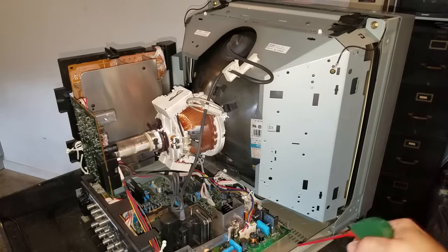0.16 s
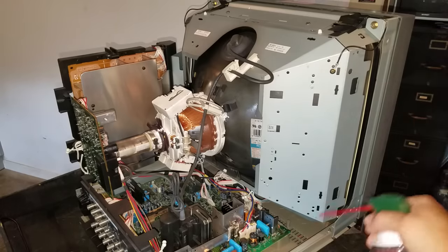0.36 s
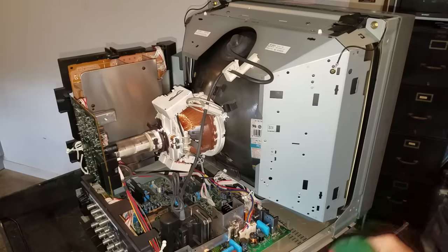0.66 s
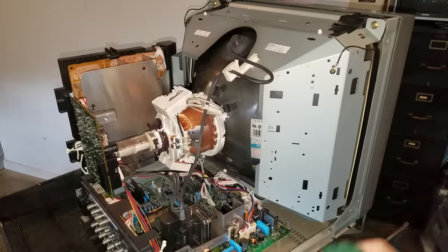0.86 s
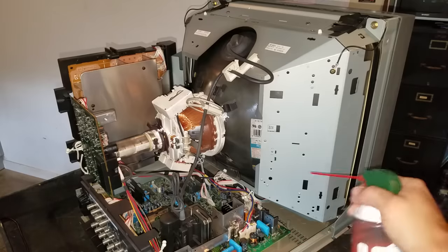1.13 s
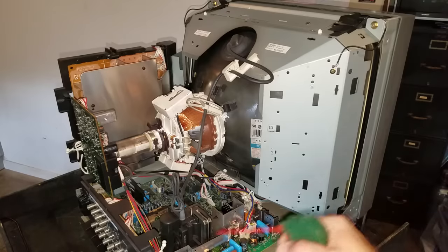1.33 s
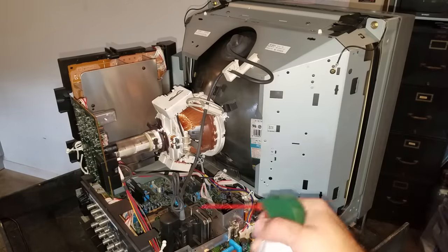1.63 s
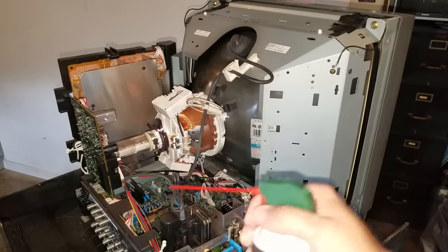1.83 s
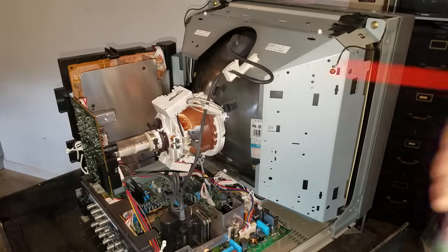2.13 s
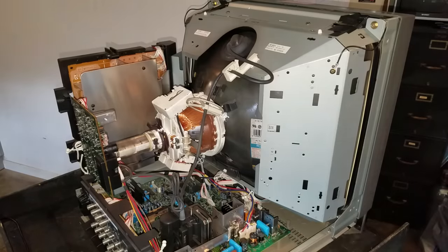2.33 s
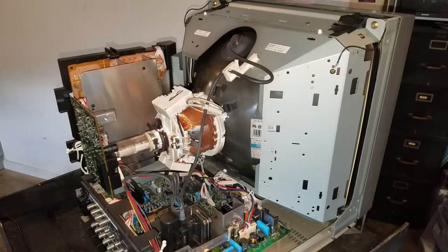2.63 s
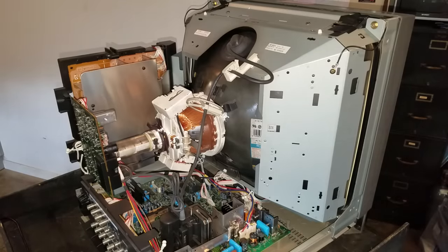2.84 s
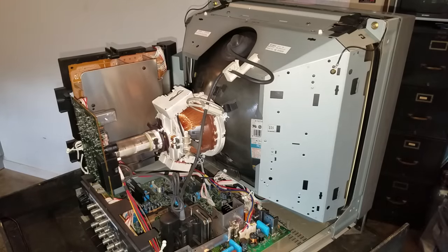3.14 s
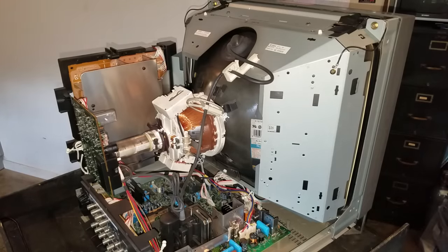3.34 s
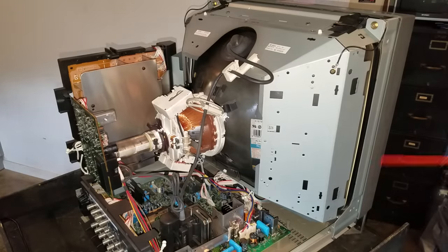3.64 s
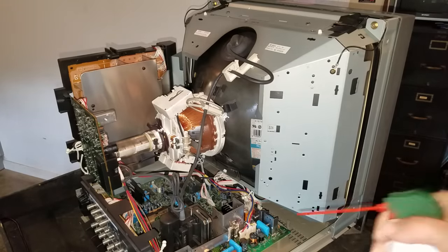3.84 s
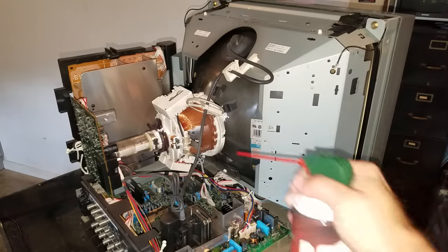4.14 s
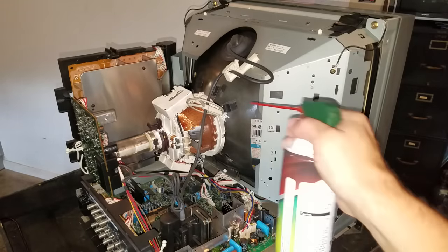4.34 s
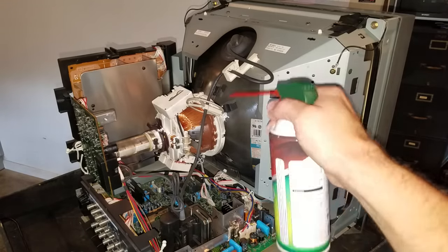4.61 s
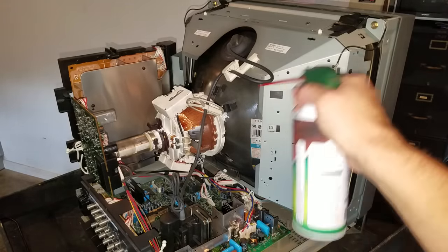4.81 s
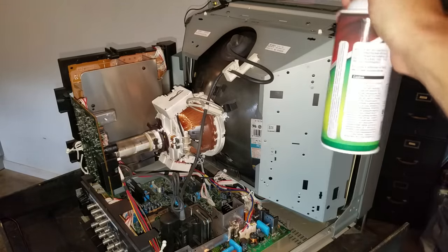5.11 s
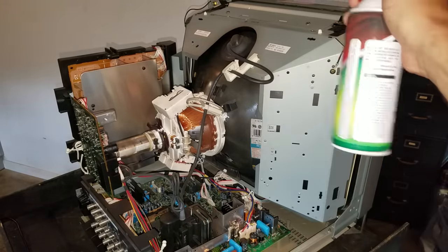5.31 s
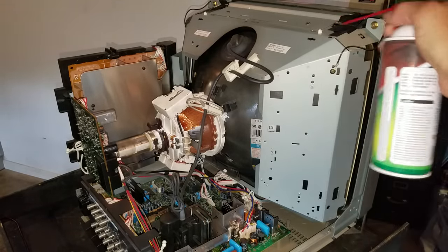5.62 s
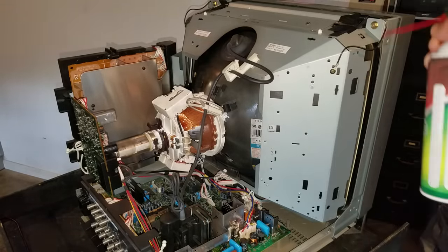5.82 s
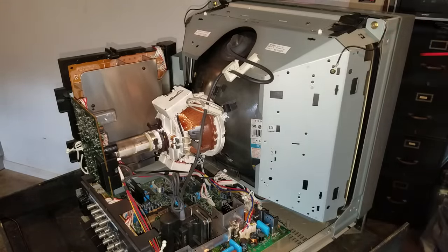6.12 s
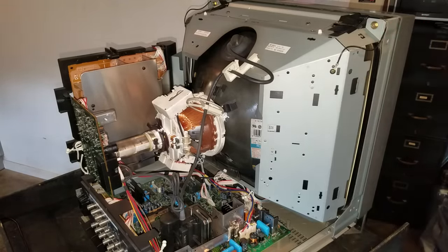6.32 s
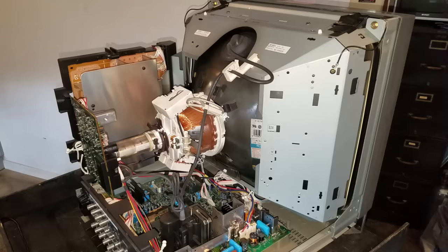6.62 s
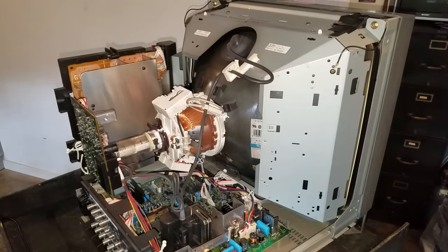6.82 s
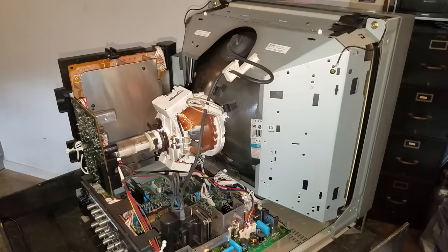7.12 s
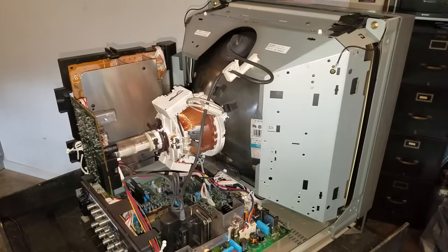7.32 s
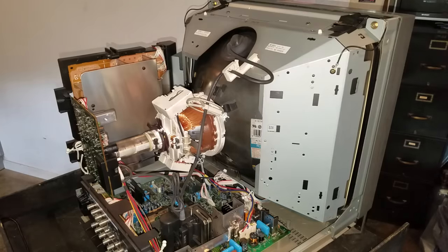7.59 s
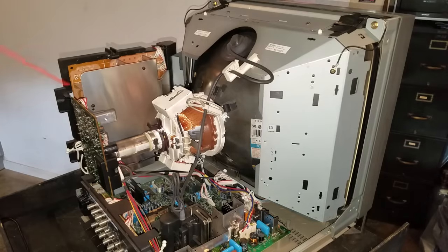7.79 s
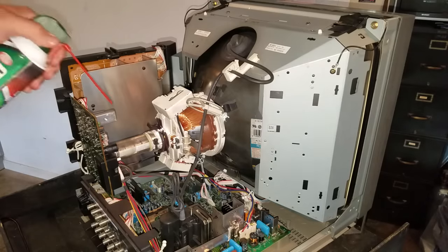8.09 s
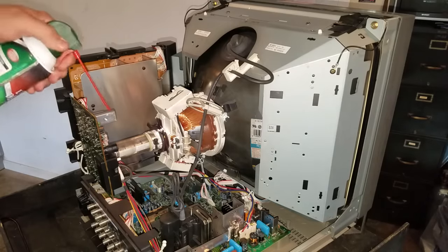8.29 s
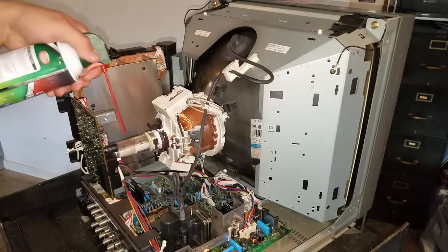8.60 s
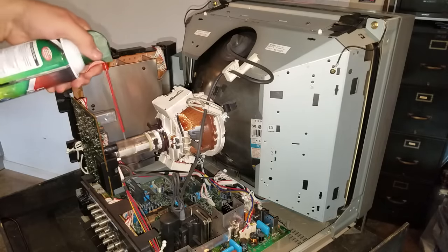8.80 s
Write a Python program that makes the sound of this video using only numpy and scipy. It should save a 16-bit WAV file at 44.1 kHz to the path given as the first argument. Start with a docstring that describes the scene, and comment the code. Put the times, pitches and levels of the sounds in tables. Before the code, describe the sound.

A spray can hisses in three long, sharp bursts over open electronics, with brief wind buffeting and a faint electrical hum.

```python
"""A sharp hiss of compressed air sweeps, in three sprays, over an open electronic chassis in a quiet room.
Turbulence at the nozzle makes the hiss; where the jet strikes, boards splash, vent slots ring and
hollows roar or whistle. A transformer hums beneath, and for a moment the draught buffets the two
microphone ports. In the pause before the last spray a hand shifts the can with rustles and taps."""
import sys
import numpy as np
from scipy import signal
from scipy.io import wavfile
from scipy.ndimage import map_coordinates

SR = 44100
rng = np.random.default_rng(int(sys.argv[2]) if len(sys.argv) > 2 else 0)


def materialize(psi):
    """Save the field psi as 16-bit PCM at rate SR to the path in sys.argv[1].

    A 1-D psi becomes a single channel; in a 2-D psi each row is a channel.
    """
    bounded = np.clip(np.atleast_2d(psi).T, -1, 1)
    quanta = np.round(bounded * 32767).astype(np.int16)
    wavfile.write(sys.argv[1], SR, quanta)


N = 394694

# Trigger presses: open_s, shut_s, release_s, drop_db
SPRAYS = [(-0.1, 2.646, .03, -18), (2.777, 6.102, .06, -12), (7.853, 9.2, .03, -12)]
# Slow changes in the spray's loudness and direction, one curve a press; the sound dips briefly after the gusts:
# time_s, nozzle_db, left_minus_right_db, splash_db, edges_db, large_hollow_db, small_hollows_db
SPRAY_LEVELS = [
    [(0, -25.5, -6, -28, -25, -42, -31), (.45, -26.5, -7.5, -31.5, -35, -39, -34),
     (.75, -23.5, -7, -27, -28.5, -34.5, -29), (1.05, -23, -8, -28.5, -28, -40, -32),
     (1.35, -27, -5.5, -31, -32.5, -39, -36), (1.8, -26.5, -5.5, -32.5, -38, -43, -43),
     (2.1, -23.5, -4.5, -31.5, -38, -57, -48), (2.3, -23, -10.5, -32.5, -42, -53, -50),
     (2.55, -24, -14.5, -32.5, -41.5, -65, -51), (2.65, -26.5, -14, -34.5, -43.5, -84, -53)],
    [(2.79, -23.5, -14, -29, -40, -75, -74), (2.93, -25.5, -18, -34, -41.5, -73, -70),
     (3.05, -26, -14, -31, -29.5, -72, -71), (3.35, -25.5, -20.5, -31, -30, -75, -70),
     (3.49, -30, -13, -34, -59, -75, -66), (3.55, -36.5, -7.5, -46, -54, -68, -63.5),
     (4.15, -40.5, -5, -46, -52.5, -58, -58.5), (4.29, -27, -4, -31, -34.5, -40.5, -39.5),
     (4.55, -29, -2.5, -26.5, -32, -46, -35), (4.9, -24.5, -3.5, -30, -32, -40.5, -37.5),
     (5.1, -27, -3.5, -33, -37.5, -48, -41), (5.4, -26, -5.5, -35, -36.5, -58, -45.5),
     (5.65, -27, -6.5, -32, -32.5, -60, -44), (5.8, -28.5, -7, -28, -46, -52, -42),
     (5.95, -25.5, -8, -24, -40.5, -49, -42), (6.11, -33, -8, -27, -32, -59, -38.5)],
    [(7.86, -27, -5, -35, -34.5, -52, -45), (7.97, -23.5, -4.5, -29.5, -34, -35.5, -34.5),
     (8.2, -25.5, -6, -31.5, -31.5, -39.5, -32.5), (8.4, -26.5, -5.5, -33.5, -29.5, -36.5, -32),
     (8.7, -26, -5, -33, -31, -37, -39), (8.95, -26, -4.5, -28, -30, -35.5, -37.5)],
]
# The jet crosses vents: start_s, hold_s, nozzle_change_db, splash_db, edges_db, slots_db
VENT_CROSSINGS = [(0.0, 0.026, -5, -23.5, -17.5, -23), (0.063, 0.024, -3.5, -41, -31, -32),
                  (0.312, 0.047, 0.5, -33, -30.5, -39), (0.481, 0.043, -1, -28, -22.5, -23),
                  (0.526, 0.03, -2.5, -31, -32, -27.5), (0.866, .04, -1.5, -33, -33, -27.5),
                  (1.115, .07, -1.5, -35, -21.5, -24), (1.201, 0.038, -2, -30, -19.5, -22.5),
                  (1.253, 0.021, 1, -28, -35, -36.5), (1.457, 0.061, 0, -31.5, -29.5, -32.5),
                  (1.607, 0.055, 0, -31, -30, -31.5), (2.17, .04, 1.5, -29.5, -45, -48),
                  (3.34, .05, 1.5, -41, -52, -48), (3.413, 0.018, 2.5, -30.5, -27.5, -33),
                  (4.29, 0.02, 0, -49, -34, -36), (4.37, 0.022, 1.5, -30, -31, -35),
                  (4.45, 0.11, 3, -29.5, -28.5, -34), (4.597, 0.088, 0.8, -32, -24, -36),
                  (4.772, 0.036, -0.5, -31, -28.5, -32), (4.915, 0.02, 3.5, -22.5, -24.5, -28.5),
                  (4.953, .05, -1.5, -41, -28.5, -27), (5.557, 0.016, 1.5, -39, -45, -29.5),
                  (5.656, 0.021, 7.5, -19, -23, -31.5), (5.705, 0.086, 0.5, -24.5, -21, -26),
                  (5.805, 0.1, 7.5, -22, -41.5, -37), (6.02, 0.019, 1.5, -30, -38, -42),
                  (6.097, 0.016, 1, -33, -46, -54), (8.067, 0.057, -0.5, -42, -54, -29),
                  (8.15, .04, -1, -35.5, -28.5, -25), (8.221, 0.072, 0.5, -29, -25, -32.5),
                  (8.302, 0.084, .3, -43, -32, -28.5), (8.436, 0.29, 1.1, -27, -29.5, -52),
                  (8.763, 0.068, 0.3, -30, -29.5, -34.5)]
# The jet passes the mouth of a hollow: start_s, hold_s, large_hollow_db, small_hollows_db
HOLLOW_BLOWS = [(0.0, 0.033, -59, -31), (0.153, .02, -33.5, -47), (0.216, 0.016, -46, -26.5),
                (0.965, 0.078, -34.5, -34), (1.477, 0.065, -47, -36), (1.743, 0.015, -35, -44),
                (3.936, .03, -57, -57), (4.954, .03, -48, -35), (5.435, .03, -46, -38),
                (5.55, 0.027, -49, -38), (5.735, 0.058, -53, -31.5), (8.114, 0.021, -42, -28.5),
                (8.81, 0.026, -39, -35)]
# Noise spectra: frequency_hz, relative_density_db
NOZZLE_SPECTRUM = [(5500, -33.5), (6600, -5), (8150, -9.5), (9640, -13), (11300, -10), (12800, -7.5),
                   (14200, -6.5), (15100, -10.5), (16500, -7.5)]
SPLASH_SPECTRUM = [(2200, -8), (3300, -0.5), (4800, 1.5), (6500, -3.5), (9000, -12.5)]
EDGE_SPECTRUM = [(1200, -19), (1600, -1.5), (2200, -3.5), (2900, -0.5), (3900, -16)]
SLOT_SPECTRUM = [(750, -11.5), (1000, 1.5), (1300, -1.5), (1800, -15)]
LARGE_HOLLOW_SPECTRUM = [(130, -12), (250, -8), (400, -3), (600, -14.5)]
SMALL_HOLLOW_SPECTRUM = [(350, -19), (550, -4.5), (800, -0.5), (1200, -12.5)]
ROOM_SPECTRUM = [(25, -21), (55, -5.5), (85, -8.5), (130, -6), (190, -3.5), (240, -7), (400, -15.5),
                 (1180, -28.5), (2890, -26), (9460, -41.5), (15800, -37)]
LARGE_EDDY_SPECTRUM = [(30, -22), (140, -0.5), (300, -11.5), (500, -17.5)]
SMALL_EDDY_SPECTRUM = [(200, -1), (420, -1.5), (750, -5.5), (1700, -18), (3000, -35)]
RUSTLE_SPECTRUM = [(500, 0), (1100, 0), (2600, 0), (4500, -11), (7500, -10), (9700, -25), (13500, -13.5),
                   (15800, -14)]
# Resonances of the struck parts, against their broad noise: pitch_hz, bandwidth_hz, relative_db
SPLASH_MODES = [(4700, 350, -10), (6350, 300, -11), (8300, 450, -13)]
EDGE_MODES = [(1716, 50, -9), (2057, 70, -9), (2665, 90, -7)]
SLOT_MODES = [(1085, 70, 2), (1290, 60, -9)]
LARGE_HOLLOW_MODES = [(388, 44, -5.5)]
SMALL_HOLLOW_MODES = [(647, 94, -7.5)]
# Likeness of the sound at the two ports: frequency_hz, coherence_ratio
PORT_COHERENCE = [(60, 0.54), (150, 0.93), (380, 0.95), (950, 0.54), (2380, 0.3), (5980, 0.02),
                  (15000, 0.033)]
# Late arrival at the left port: time_s, delay_ms
LEFT_DELAY = [(0, 0.083), (1.3, 0.037), (1.8, 0.038), (4.5, -0.15), (5.8, 0.14), (6.3, 0.047), (6.8, -0.17),
              (7.7, -0.084), (8.95, -0.084)]
# Swelling and sinking of hum and room air: time_s, level_db
BACKGROUND_LEVEL = [ (0.0, -44.5), (0.17, -41), (0.56, -45.5), (0.63, -42), (1.02, -37), (1.15, -43),
                    (2.13, -39), (2.3, -45.5), (3.62, -54), (4.06, -55.5), (4.17, -49), (4.29, -40.5),
                    (4.67, -39.5), (5.46, -36.5), (5.55, -39), (5.92, -48.5), (6.14, -44.5), (6.43, -46),
                    (6.94, -39.5), (7.63, -38), (8.46, -38.5), (8.82, -37.5), (8.95, -38), ]
# Faint partials against the main hum: frequency_ratio, relative_db
HUM_PARTIALS = [(.5, -29), (2, -25)]
# The jet crosses a hole, and once (the wide row at 1.227 s) the can spits: centre_s, length_s, pitch_hz,
# bandwidth_hz, level_db
HOLE_WHISTLES = [(0.255, 0.18, 804, 60, -35), (0.856, 0.21, 1645, 60, -31), (1.227, 0.026, 4270, 2490, -18),
                 (1.493, 0.074, 610, 60, -31.5), (1.505, 0.063, 1374, 80, -25.5),
                 (1.745, 0.066, 644, 50, -31), (4.438, 0.016, 1510, 80, -25.5),
                 (4.964, 0.055, 830, 60, -31), (5.947, 0.3, 4730, 600, -31), (6.052, 0.24, 2800, 800, -26),
                 (6.086, 0.083, 574, 45, -36), (8.136, 0.09, 710, 60, -40.5), (8.304, 0.1, 1950, 80, -30),
                 (8.614, 0.15, 2350, 250, -26)]
# Gusts on the ports: start_s, hold_s, left_db, right_db, small_over_large_eddies_db
PORT_GUSTS = [(2.354, 0.033, -34.5, -44, -20), (2.457, 0.036, -36, -37.5, -12),
              (2.583, 0.034, -35, -36, -20), (2.64, .02, -28, -44, -28), (2.801, 0.0047, -5, -35, -16),
              (2.842, 0.046, -14, -37, -27), (2.883, 0.043, -8, -40, -18), (2.913, 0.014, -5.5, -36, 5),
              (2.955, 0.048, -5, -31, -2), (3.0, 0.46, -27.5, -25, 1), (3.047, 0.029, -5.5, -31, 8.5),
              (3.082, 0.011, -11, -32, 0), (3.154, 0.017, -14, -30, -2.5), (3.255, .03, -20, -28, -4),
              (3.338, 0.056, -10.5, -41, -7.5), (3.461, 0.0094, -9, -42, -4), (3.474, 0.0041, -13, -40, 3),
              (3.498, 0.018, -47, -46, -30), (4.923, 0.016, -35, -51, -16.5),
              (5.565, 0.24, -48, -48.5, -12), (5.89, 0.038, -50, -35, -6)]
# Single eddies at the right port: time_s, level_db, time_scale_ms
EDDY_POPS = [(3.22, -8, 1.5), (3.297, -10, 1.8), (3.319, -9, 2.5), (3.411, -8, 2.5)]
# Strokes of hand and sleeve: start_s, decay_s, level_db, relative_treble_db
HAND_STROKES = [(6.556, 0.44, -61, -2), (6.676, 0.11, -56, -1), (6.834, .17, -63, 7),
                (7.108, 0.14, -54.5, -6), (7.238, 0.05, -59, 0), (7.315, 0.19, -58.5, 4),
                (7.462, .07, -60, 3), (7.592, 0.12, -57, -4), (7.718, 0.33, -65, -3)]
# Knocks as the can is shifted: start_s, peak_db, pitch_hz, ring_s
CAN_TAPS = [(6.602, -40, 940, 0.0086), (6.676, -35, 1260, 0.01), (6.741, -39.5, 1170, 0.01),
            (7.112, -40, 940, .012), (7.149, -34, 2680, .012), (7.243, -47, 1630, .012),
            (7.287, -43, 915, 0.011), (7.358, -44, 1940, .012), (7.466, -38, 2800, 0.0092),
            (7.572, -31, 1910, 0.0088), (7.594, -39, 560, .015)]

TIME_S = np.arange(N) / SR
HOP = 32  # samples a step of the swell envelopes
HISS_TAIL_DB_PER_S, BODY_TAIL_DB_PER_S = 181, 111
RESIDUE_DB = -14  # what is left in the room once a sound stops


def amp(db):
    """Amplitude grows tenfold every 20 dB."""
    return 10 ** (np.asarray(db) / 20)


def unit_rms(x):
    """Normalisation to unit mean power."""
    return x / np.sqrt(np.mean(x ** 2) + 1e-20)


def plus_db(a_db, b_db):
    """Incoherent sounds add in power."""
    return 10 * np.log10(amp(a_db) ** 2 + amp(b_db) ** 2)


def in_time(rows):
    """Linear interpolation of each column, one value a sample."""
    times_s, *columns = np.transpose(rows)
    return [np.interp(TIME_S, times_s, column) for column in columns]


def at_hz(points, hz):
    """Interpolation on a log-frequency axis."""
    frequencies_hz, values = np.transpose(points)
    return np.interp(np.log(hz), np.log(frequencies_hz), values)


def filtered(x, order, hz, kind="low"):
    """A filter with a maximally flat passband."""
    return signal.sosfilt(signal.butter(order, hz, kind, fs=SR, output="sos"), x)


def drift(rate_hz):
    """Low-passed noise gives a slow random fluctuation of rms 1."""
    step, settle = 40, 2000
    pole = np.exp(-2 * np.pi * step * rate_hz / SR)
    white = rng.standard_normal(N // step + settle + 2)
    slow = signal.lfilter([1], [1, -2 * pole, pole * pole], white)[settle:]
    return np.interp(np.arange(N) / step, np.arange(len(slow)), unit_rms(slow))


def resonate(x, hz, width_hz):
    """A damped resonator with unit gain at its peak."""
    pole = np.exp(-np.pi * width_hz / SR)
    gain = (1 - pole * pole) / 2
    return signal.lfilter([gain, 0, -gain], [1, -2 * pole * np.cos(2 * np.pi * hz / SR), pole * pole], x)


def panned(left_minus_right_db):
    """A level difference gives direction: two gains whose mean is 1."""
    left = np.atleast_1d(amp(left_minus_right_db))
    return 2 * np.array([left, np.ones_like(left)]) / (1 + left)


def both_ports(x):
    """A path difference brings sound to the left port early or late."""
    delay = in_time(LEFT_DELAY)[0] * SR / 1000
    return np.array([map_coordinates(x, [np.arange(N) - delay], order=3, mode="nearest"), x])


def swells(events, rise_db_per_s, fall_db_per_s):
    """Exponential rise up to the start, hold and exponential decay: one row of gains an event."""
    t, start_s, hold_s = np.arange(0, N + HOP, HOP) / SR, events[:, :1], events[:, 1:2]
    before_s, after_s = np.maximum(start_s - t, 0), np.maximum(t - start_s - hold_s, 0)
    return amp(-rise_db_per_s * before_s - fall_db_per_s * after_s)


def per_sample(envelope):
    """Linear interpolation from hops to samples."""
    return np.interp(np.arange(N) / HOP, np.arange(len(envelope)), envelope)


def summed_db(shapes, levels_db):
    """Overlapping swells add in power: one level curve a column."""
    powers = amp(levels_db).T ** 2 @ shapes ** 2
    return [per_sample(10 * np.log10(power + 1e-12)) for power in powers]


def turbulence(spectrum, together_db, patchy_db, rate_hz, coherent=True):
    """Random modulation: third-octave bands of stereo noise flicker partly in step, partly alone."""
    shared, separate, together = 0, 0, drift(rate_hz)
    limits_hz = 22 * 2 ** np.arange(0, 9.7, 1 / 3)
    white = rng.standard_normal((2, 3, N))  # neighbouring bands get unrelated noise
    for k, (low, high) in enumerate(zip(limits_hz, limits_hz[1:])):
        hz = np.sqrt(low * high)
        if spectrum[0][0] < hz * 1.12 and hz < spectrum[-1][0] * 1.12:
            band = filtered(white[k % 2], 2, [low, high], "band")
            coherence = coherent * np.clip(at_hz(PORT_COHERENCE, hz), 0, 1)
            gain = amp(at_hz(spectrum, hz) + together_db * together + patchy_db * drift(rate_hz))
            shared = shared + gain * np.sqrt(coherence) * band[0]
            separate = separate + gain * np.sqrt(1 - coherence) * band[1:]
    out = both_ports(shared) + separate
    return out / np.sqrt(np.mean(out.mean(axis=0) ** 2))


def struck_part(spectrum, modes, together_db, patchy_db, rate_hz, ring_db=0):
    """Forced resonance: air on a surface makes broad noise and drives modes that flicker as it wanders."""
    ringing, flicker_db = 0, 2
    for hz, width_hz, db in modes:
        gain = amp(db + flicker_db * drift(5.7))
        ringing = ringing + gain * unit_rms(resonate(rng.standard_normal(N), hz, width_hz))
    return turbulence(spectrum, together_db, patchy_db, rate_hz) + amp(ring_db) * both_ports(ringing)


def valve_db(tail_db_per_s, drop_share=1):
    """The valve gates the flow: a quick opening, a drop on release, then exponential decay."""
    opening_s, closed_db = .03, -23
    out = np.full(N, -90.)
    for open_s, shut_s, release_s, drop_db in SPRAYS:
        onset_db = closed_db * np.clip(1 - (TIME_S - open_s) / opening_s, 0, 1) ** 2
        release_db = drop_share * drop_db * np.clip((TIME_S - shut_s) / release_s, 0, 1)
        decay_db = tail_db_per_s * np.maximum(TIME_S - shut_s - release_s, 0)
        out = np.where(TIME_S >= open_s, onset_db + release_db - decay_db, out)
    return out


def nozzle_hiss(level_db):
    """Turbulent mixing radiates hiss; a resonance of the thin tube lifts the very top."""
    hiss = turbulence(NOZZLE_SPECTRUM, together_db=.53, patchy_db=.96, rate_hz=20)
    sizzle = amp(1.5) * resonate(hiss, hz=15300, width_hz=700)
    return amp(level_db + valve_db(HISS_TAIL_DB_PER_S)) * (hiss + sizzle)


def board_splash(level_db):
    """An impinging jet radiates bright noise from the boards."""
    return amp(level_db) * struck_part(SPLASH_SPECTRUM, SPLASH_MODES, .58, 1.3, rate_hz=17)


def edge_noise(level_db):
    """Edges scatter turbulence into ringing midrange noise."""
    return amp(level_db) * struck_part(EDGE_SPECTRUM, EDGE_MODES, .92, 2.7, rate_hz=16)


def vent_slots(level_db):
    """Slots resonate fully only when squarely struck, and pass little below their lowest mode."""
    full_ring_db, loss_db_per_db = -25, .45
    ring_db = loss_db_per_db * np.minimum(level_db - full_ring_db, 0)
    noise = struck_part(SLOT_SPECTRUM, SLOT_MODES, .7, .93, rate_hz=22, ring_db=ring_db)
    return amp(level_db) * filtered(noise, 6, 1036, "high")


def hollow_roar(large_db, small_db):
    """Cavity resonance colours the noise: the larger the hollow, the deeper its roar."""
    large = struck_part(LARGE_HOLLOW_SPECTRUM, LARGE_HOLLOW_MODES, 1, 2.3, rate_hz=14)
    small = struck_part(SMALL_HOLLOW_SPECTRUM, SMALL_HOLLOW_MODES, 1, 1.5, rate_hz=9.9)
    return amp(large_db) * large + amp(small_db) * small


def jet():
    """One jet excites every part; levels swell as it crosses vents and hollows."""
    nozzle_db, pan_db, splash_db, edges_db, large_db, small_db = in_time(sum(SPRAY_LEVELS, []))
    crossings, blows = np.array(VENT_CROSSINGS), np.array(HOLLOW_BLOWS)
    crossing_shapes = swells(crossings, rise_db_per_s=901, fall_db_per_s=279.5)
    blow_shapes = swells(blows, rise_db_per_s=300, fall_db_per_s=150)
    splash_swell_db, edge_swell_db, slot_swell_db = summed_db(crossing_shapes, crossings[:, 3:])
    large_swell_db, small_swell_db = summed_db(blow_shapes, blows[:, 2:])
    flow_db = valve_db(BODY_TAIL_DB_PER_S, drop_share=.88)
    pan_db = pan_db * np.interp(flow_db, [2 * RESIDUE_DB, 0], [.12, 1])  # the dying room is more even
    struck_pan = panned(.75 * pan_db + 2)  # nearer the middle than the nozzle
    hiss = panned(pan_db) * nozzle_hiss(nozzle_db + per_sample(crossings[:, 2] @ crossing_shapes))
    splash = panned(.5 * pan_db) * board_splash(plus_db(splash_db, splash_swell_db))
    edges = struck_pan * edge_noise(plus_db(edges_db, edge_swell_db))
    slots = struck_pan * vent_slots(plus_db(edges_db - 4, slot_swell_db))
    roar = panned(-2.7) * hollow_roar(plus_db(large_db, large_swell_db), plus_db(small_db, small_swell_db))
    return hiss + amp(flow_db) * (splash + edges + slots + roar)


def transformer_hum(pitch_hz=120.1, waver_db=1.8):
    """Magnetostriction: the core vibrates at twice the mains rate, with faint wavering partials."""
    phase = 2 * np.pi * pitch_hz * TIME_S
    partials = sum(amp(db + 1.5 * drift(6)) * np.sin(ratio * phase) for ratio, db in HUM_PARTIALS)
    return np.sqrt(2) * amp(-waver_db * drift(8.6)) * (np.sin(phase) + partials) * panned(-2.3)


def room_air():
    """Ambient noise forms a soft, bass-heavy floor under the hum."""
    return amp(-10.5) * turbulence(ROOM_SPECTRUM, .97, 1.3, rate_hz=6)


def whistles():
    """Sharp resonance narrows noise to a tone as the jet passes a hole; it then decays in the room."""
    out, air = np.zeros(N), rng.standard_normal(N)
    for centre_s, length_s, hz, width_hz, db in HOLE_WHISTLES:
        age_s = TIME_S - centre_s
        tone = unit_rms(resonate(resonate(air, hz, width_hz), hz, width_hz))
        swell = np.exp(-(2 * age_s / length_s) ** 4)
        tail = (age_s > 0) * amp(RESIDUE_DB - BODY_TAIL_DB_PER_S * np.maximum(age_s - length_s / 2, 0))
        out += amp(db) * np.maximum(swell, tail) * tone
    return both_ports(out) * panned(-1.8)


def draught(rise_db_per_s=399.5):
    """While the can blows, eddies press incoherently on the two ports; the small ones die first."""
    gusts = np.array(PORT_GUSTS)
    small_over_large_db = gusts[:, 4:] + [0, 9]  # the right port lies in finer, brighter flow
    large_db = gusts[:, 2:4] - 10 * np.log10(2 + 2 * amp(small_over_large_db) ** 2)
    small_db = large_db + small_over_large_db
    large_gain = amp(summed_db(swells(gusts, rise_db_per_s, fall_db_per_s=459), large_db))
    small_gain = amp(summed_db(swells(gusts, rise_db_per_s, fall_db_per_s=802), small_db))
    large = large_gain * turbulence(LARGE_EDDY_SPECTRUM, 1.3, 3.5, rate_hz=26, coherent=False)
    small = small_gain * turbulence(SMALL_EDDY_SPECTRUM, 2.4, 1.8, rate_hz=49.5, coherent=False)
    return amp(valve_db(HISS_TAIL_DB_PER_S)) * (large + small)


def eddy_pops():
    """An eddy passing the right port is a pressure pulse: a pull, a sudden push, a slow recoil."""
    out = np.zeros((2, N))
    for time_s, db, scale_ms in EDDY_POPS:
        passage = np.clip((TIME_S - time_s) * 1000 / scale_ms, -30, 30)
        pull = -.7 * np.exp(-(1.1 * passage) ** 2)
        push_and_recoil = (1.5 - passage) * np.exp(-.6 * passage)
        out[1] += amp(db) * np.where(passage < 0, pull, push_and_recoil)
    return filtered(out, 2, hz=1300)  # the port rounds the edge


def hand_rustles(crossover_hz=3620):
    """Friction of hand and sleeve: grainy noise starts at once and fades, brighter or duller by stroke."""
    grain = turbulence(RUSTLE_SPECTRUM, 1.3, 1.8, rate_hz=61)
    body, treble = filtered(grain, 2, crossover_hz), filtered(grain, 2, crossover_hz, "high")
    out = np.zeros((2, N))
    for start_s, decay_s, db, treble_db in HAND_STROKES:
        fade = (TIME_S > start_s) * np.exp(-((TIME_S - start_s) / decay_s) ** 2)
        out += amp(db) * fade * (body - amp(treble_db) * treble)  # the bands are in opposite phase
    return out


def can_taps(scatter_s=.08):
    """An impulse excites a heavily damped mode; a quick scatter of echoes from the case follows."""
    out = np.zeros(N)
    for (start_s, db, hz, ring_s), lateness in zip(CAN_TAPS, rng.random((len(CAN_TAPS), 30))):
        impulses = np.full(N // 20, 1e-18)
        impulses[(lateness * scatter_s * SR).astype(int)] = .58 * np.cos(50 * lateness) * amp(-20 * lateness)
        impulses[0] = 1
        ring = resonate(impulses, hz, width_hz=1.8 / ring_s)
        start = round(start_s * SR)
        out[start:start + len(ring)] += amp(db) * ring / np.abs(ring).max()
    return both_ports(out)


def scene():
    """Superposition: the pressures of all sources add at the two ports."""
    spray = jet() + whistles() + draught() + eddy_pops()
    background = amp(in_time(BACKGROUND_LEVEL)[0]) * (transformer_hum() + room_air())
    return spray + background + can_taps() + hand_rustles()


def record(dry):
    """Band limiting and saturation: the microphone drops deep bass, rounds peaks and cuts the top."""
    bass_cut_hz, top_cut_hz = 45, 15780
    rounded = 1.174 * np.tanh(filtered(dry, 1, bass_cut_hz, "high") / 1.455)
    return signal.sosfilt(signal.ellip(12, .5, 75, top_cut_hz, fs=SR, output="sos"), rounded)


dry = scene()
out = record(dry)
materialize(out)
```